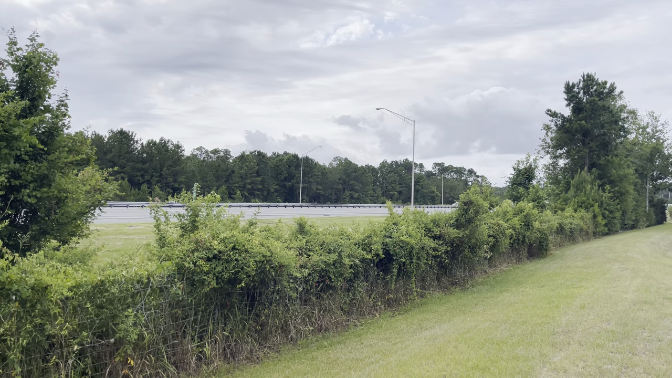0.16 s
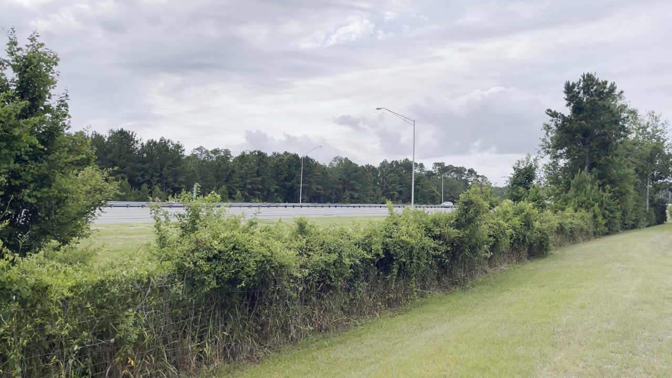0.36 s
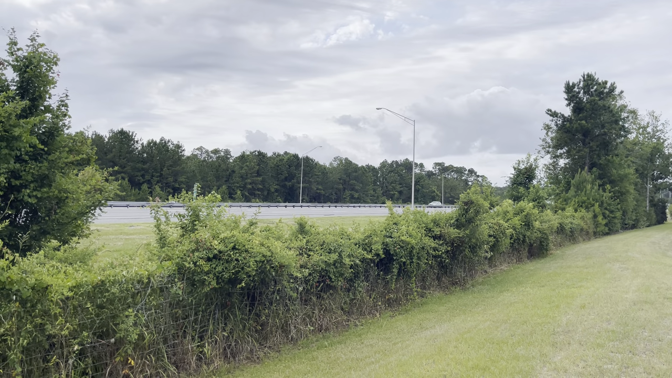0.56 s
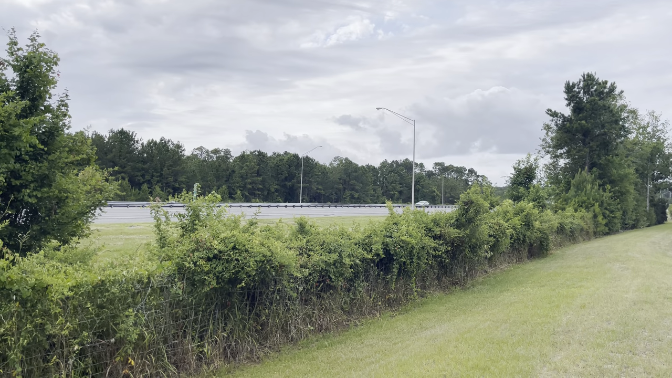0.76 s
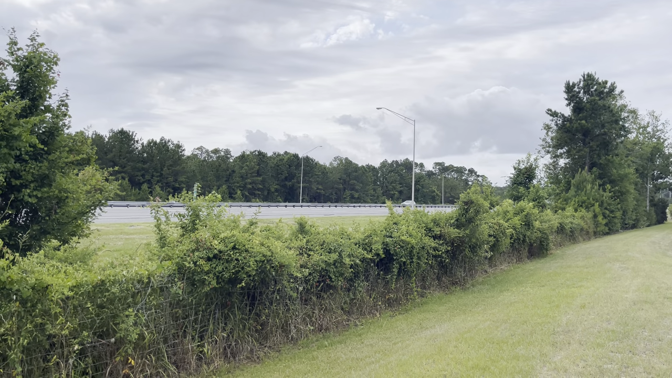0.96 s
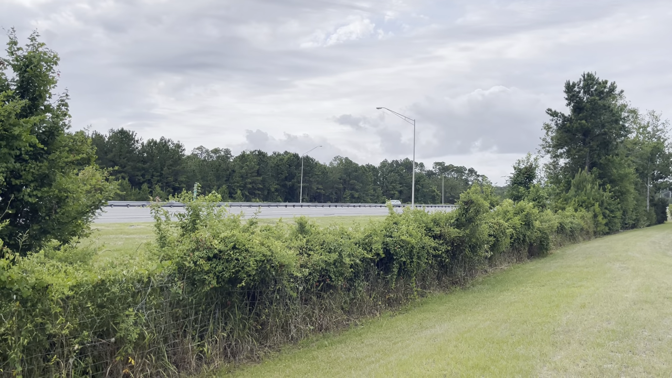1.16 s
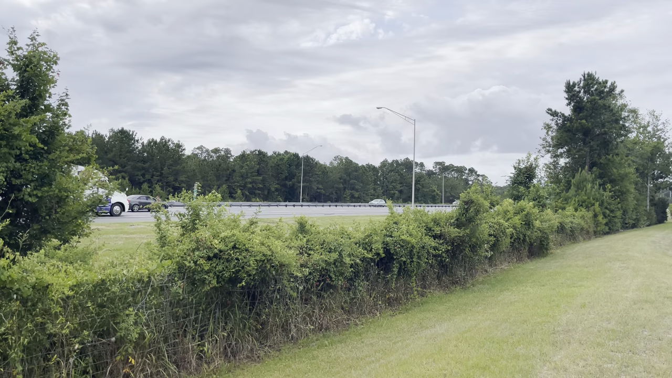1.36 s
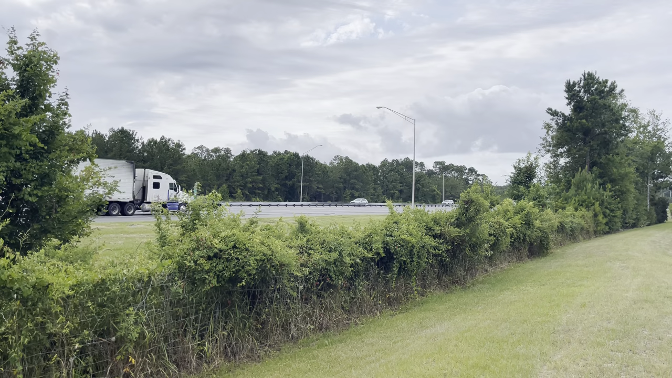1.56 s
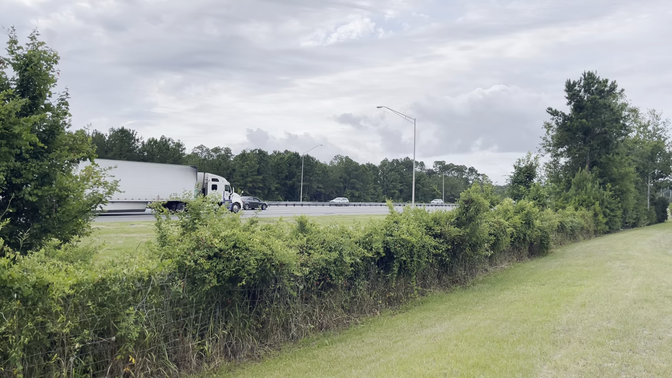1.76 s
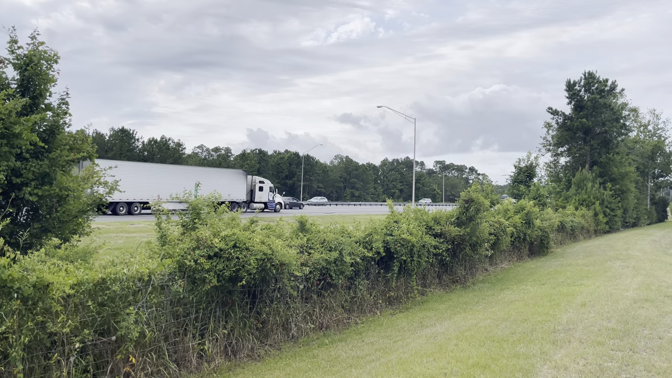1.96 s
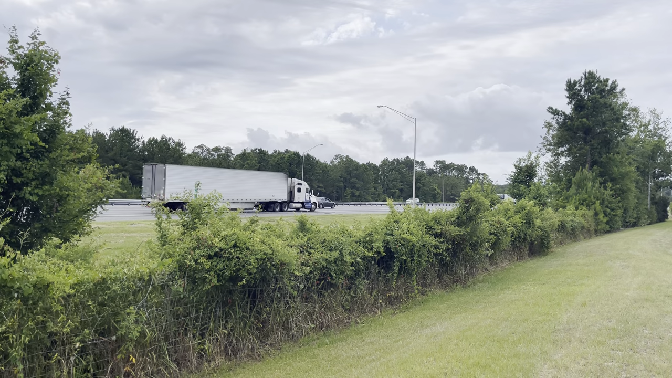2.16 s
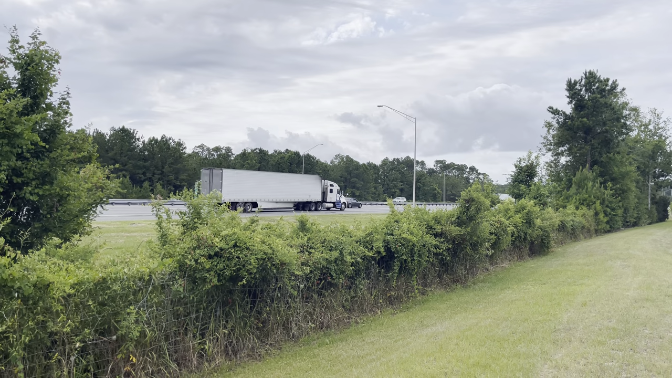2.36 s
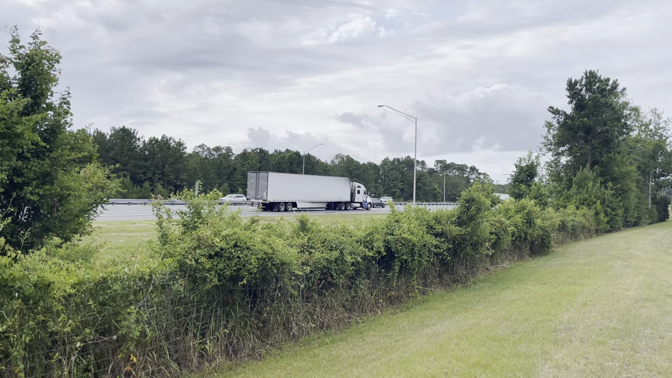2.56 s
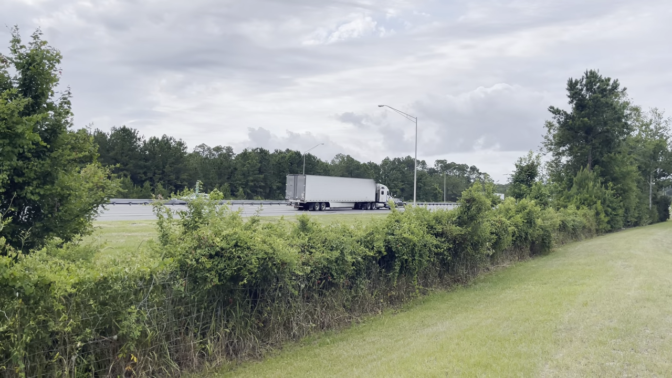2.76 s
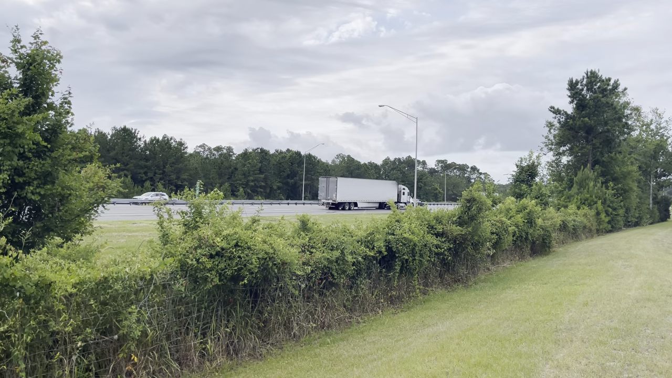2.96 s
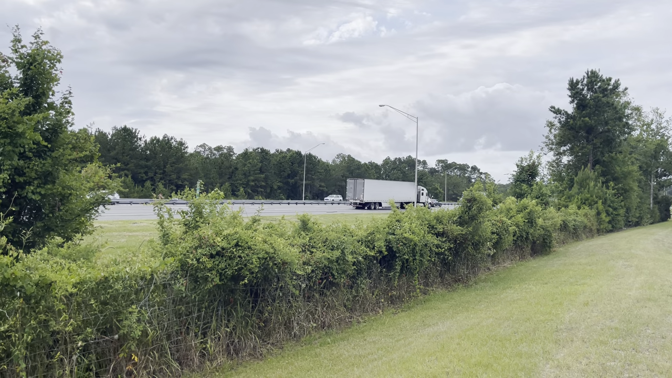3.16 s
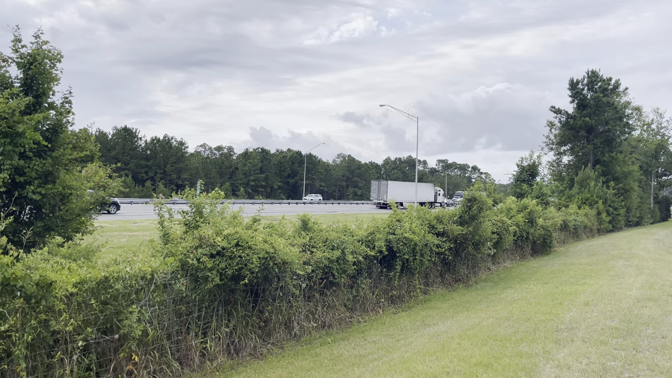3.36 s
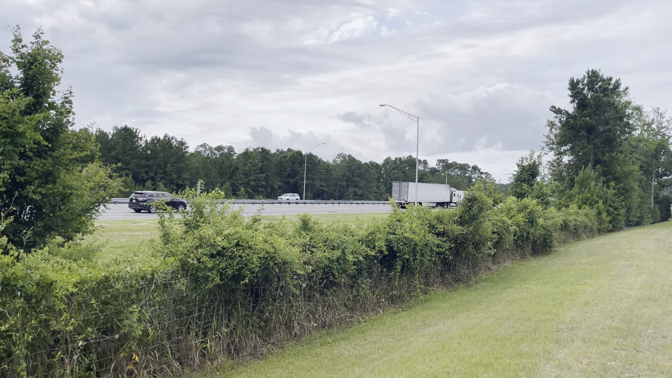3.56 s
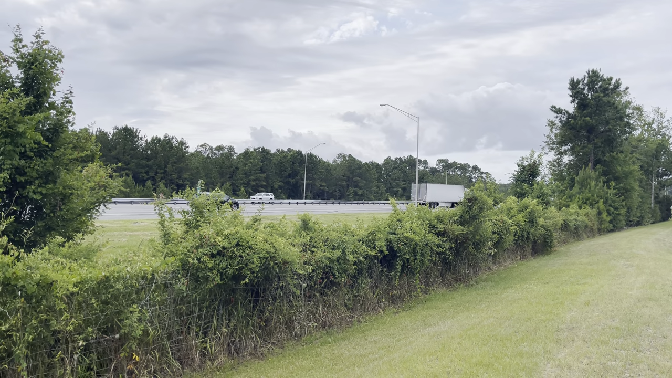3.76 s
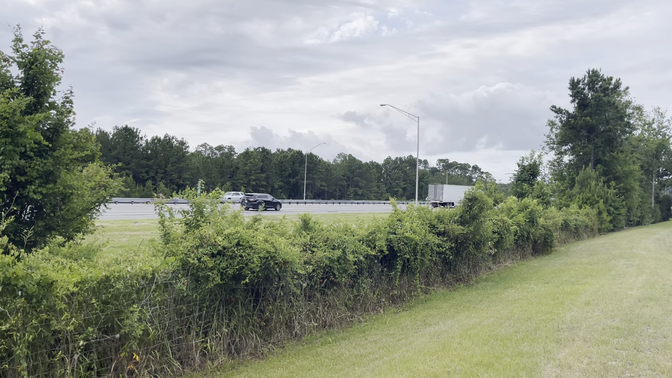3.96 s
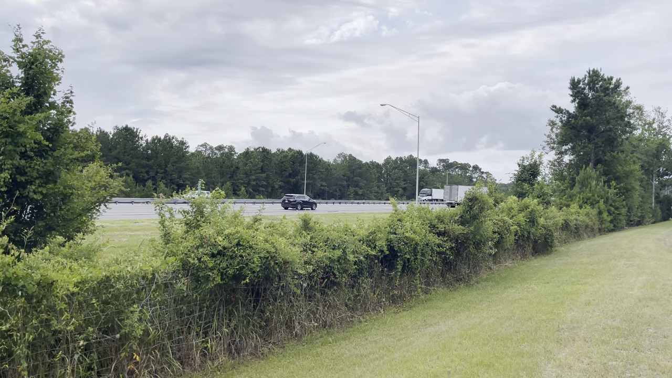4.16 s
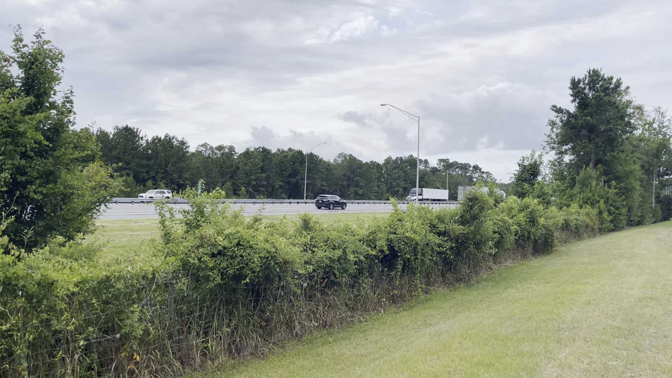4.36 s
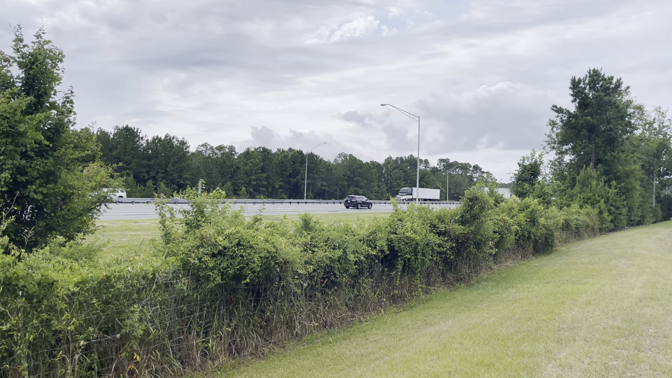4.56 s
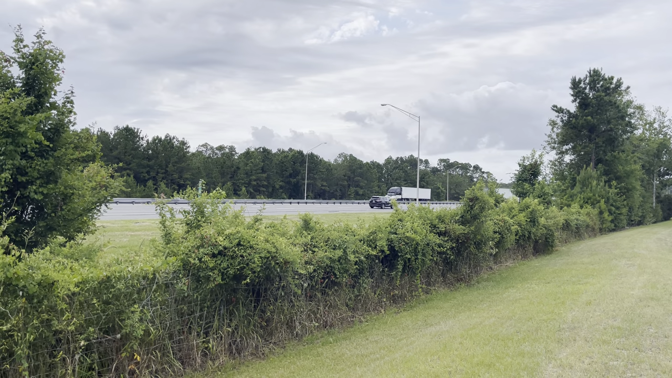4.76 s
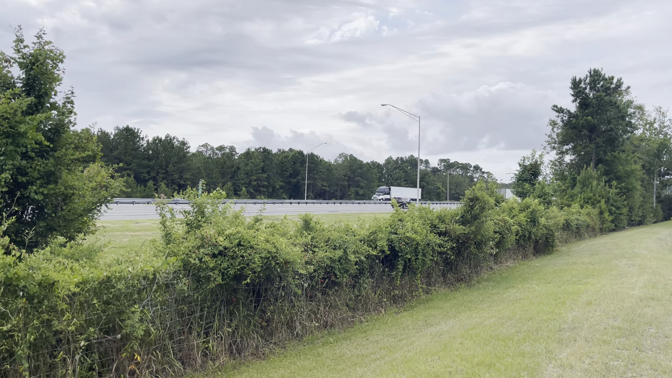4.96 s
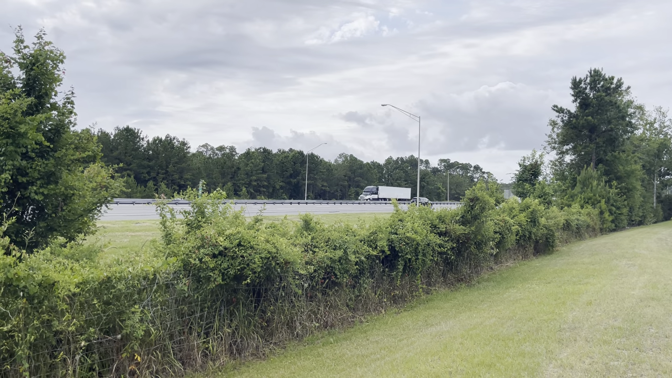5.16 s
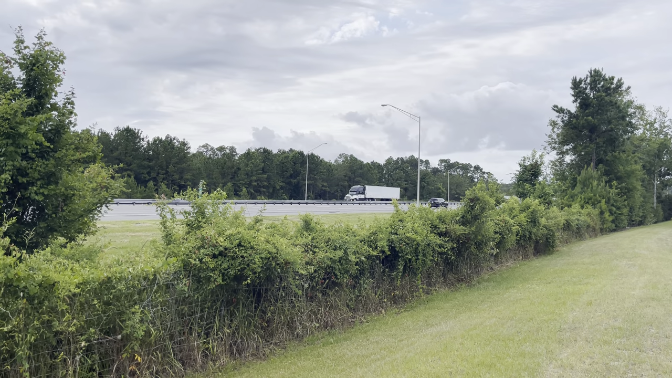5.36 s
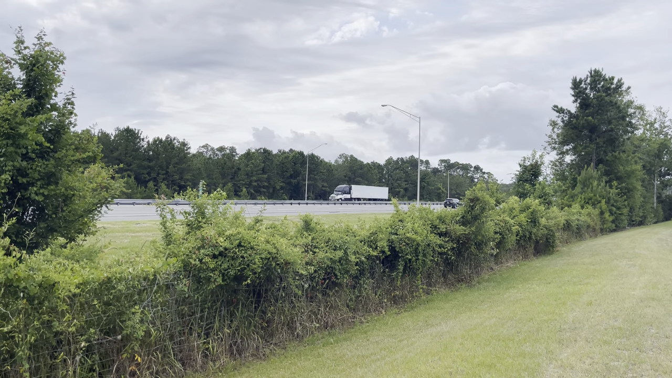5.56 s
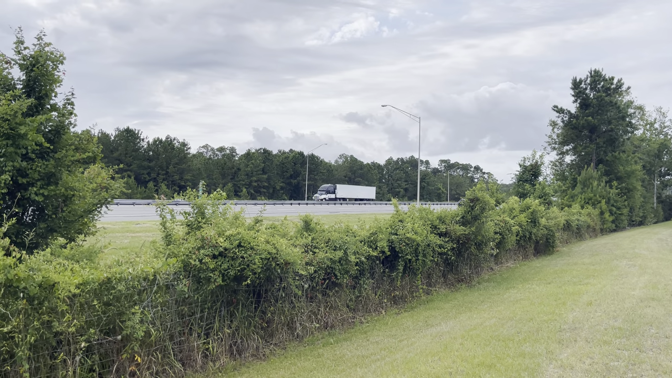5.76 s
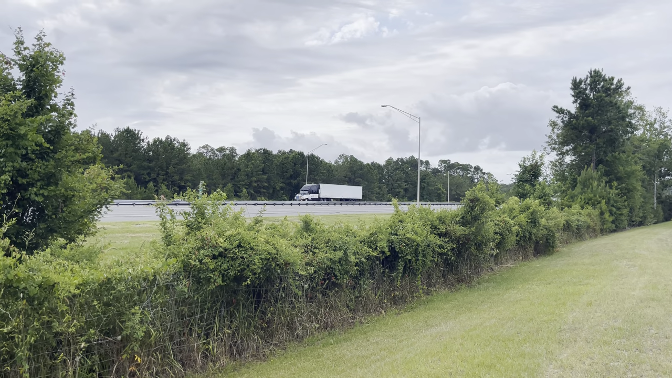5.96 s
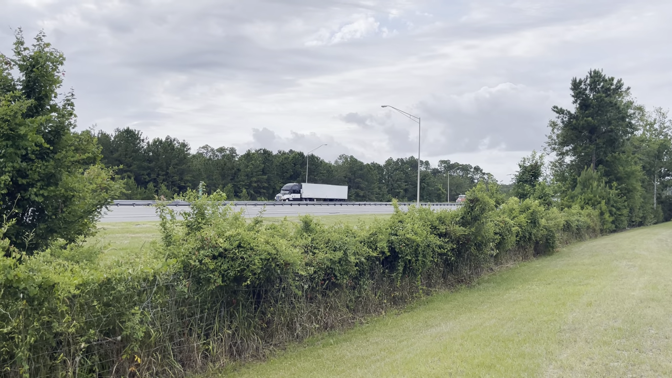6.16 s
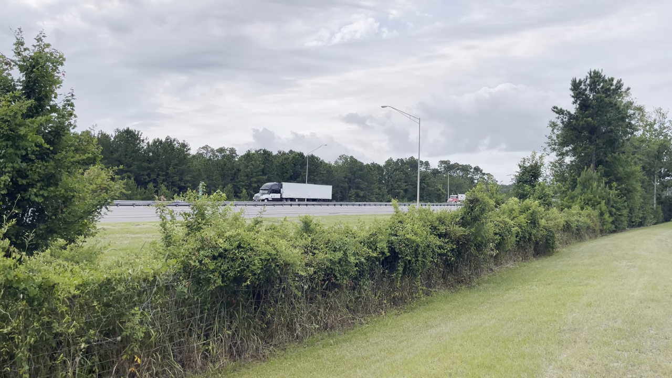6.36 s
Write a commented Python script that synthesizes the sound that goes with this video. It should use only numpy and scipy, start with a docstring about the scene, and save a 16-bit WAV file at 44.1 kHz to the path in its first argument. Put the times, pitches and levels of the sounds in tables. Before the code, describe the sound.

Wide stereo from a grassy roadside, some distance from the lanes. A truck passes early with a rough engine rush, tyre hiss and a high whine gliding downward, then dwindles to the right. Low engine hum pulses slowly while softer cars pass and a distant tyre note sings briefly. Faint high hiss and a thin insect chirr sit above the road roar; fresh tyre noise rises on the left near the close.

```python
"""Behind a hedge beside a highway. A heavy truck passes from left to right: its exhaust note (a stack of
cosines), tread drone and high whine sink together by the Doppler shift, over engine rush and tyre hiss of
shaped noise. Its note then throbs against the steady engine tones of an oncoming truck. Around it are
the tyre roar of the whole road, passing cars, a faint hiss, an insect and one small tick; near the end
more traffic draws up from the left."""
import sys
import numpy as np
from scipy import signal
from scipy.fft import rfft, irfft
from scipy.io import wavfile
from scipy.ndimage import map_coordinates

SR = 44100
rng = np.random.default_rng(int(sys.argv[2]) if len(sys.argv) > 2 else 0)


def store_wav(level_fs):
    """Save 16-bit WAV to argv[1]."""
    pcm = np.round(np.clip(np.atleast_2d(level_fs), -1, 1) * 32767)
    wavfile.write(sys.argv[1], SR, pcm.T.astype(np.int16))


N = 283122
TIME = np.arange(N) / SR  # seconds

# The roar of the whole road. Each row: pitch in Hz, relative level per Hz in dB.
ROAD_SPECTRUM = [(22, -81), (36, -60.5), (55, -51), (130, -48.5), (200, -63), (400, -69.5), (560, -58),
                 (740, -53.5), (920, -64), (1120, -62), (1800, -76), (4200, -87.5), (5500, -87.5),
                 (7200, -96.5), (8400, -100)]
# How the road swells. Each row: time in seconds, change of level in dB.
ROAD_SWELL_DB = [(0, -0.5), (1.2, -1.5), (2.6, 3.5), (3.6, 1), (5, 1.7), (5.4, -1.7), (6.42, 1.9)]
# How alike the road sounds left and right. Each row: pitch in Hz, likeness from -1 to 1.
ROAD_LIKENESS = [(60, 1), (120, 0.9), (250, 0.73), (520, 0.48), (750, 0.49), (1060, -0.31), (2170, 0.27),
                 (4460, -0.093), (9000, -0.055)]
# Tyres hidden by trees on the left at the start. Each row: pitch in Hz, relative level per Hz in dB.
HIDDEN_TYRE_SPECTRUM = [(200, -78), (450, -76), (580, -57.5), (720, -58.5), (900, -52.5), (1050, -59),
                        (1250, -78), (3000, -100)]
# Tyres of traffic drawing up on the left. Each row: pitch in Hz, relative level per Hz in dB.
ARRIVAL_TYRE_SPECTRUM = [(100, -63.5), (300, -62.5), (500, -61.5), (830, -56.5), (1100, -56.5),
                         (1500, -68.5), (2200, -78.5), (4000, -86.5), (8000, -105)]
# The shape of the high hiss. Each row: pitch in Hz, relative level per Hz in dB.
HISS_SPECTRUM = [(3000, -110), (7000, -101), (7900, -92.5), (8550, -93), (9200, -85.5), (9800, -93.5),
                 (10500, -100)]
# How loud the high hiss is. Each row: time in seconds, level in dB.
HISS_LEVEL = [(0.08, -54.5), (0.6, -51), (2.3, -50), (3.22, -55), (3.82, -54), (5.63, -56.5), (6.02, -51),
              (6.35, -55)]
# The insect's uneven swells. Each row: time in seconds, relative level in dB.
CHIRR_SWELLS = [(0, -72), (.4, -66), (.6, -51), (.75, -46.5), (1.05, -62), (1.25, -58), (1.48, -47.5),
                (1.8, -64), (2.5, -70), (2.75, -57), (3.15, -72), (3.58, -59), (3.8, -72), (4.1, -72),
                (4.35, -57.5), (4.5, -61), (4.65, -56), (4.78, -66), (5.1, -64), (5.24, -55), (5.41, -52.5),
                (5.51, -62), (5.62, -55.5), (5.74, -56), (5.85, -51.5), (6.02, -58), (6.18, -56),
                (6.32, -68)]
# The insect's pitch, and the widths of its core and skirt (Hz).
CHIRR_HZ, CHIRR_CORE_HZ, CHIRR_SKIRT_HZ = 5070, 110, 360
# Cars, each loudest in a gap between the trees. Each row: time abreast in seconds, distance of its lane
# in metres, middle of the gap in seconds, half time in the gap in seconds, relative level in dB.
CAR_PASSES = [(0.399, 35.5, 2.11, 0.57, -6), (2.6, 27.6, 4.29, 1, -9.5)]
# Tyres of a car in the near lane. Each row: pitch in Hz, relative level per Hz in dB.
CAR_TYRE_SPECTRUM = [(200, -76), (700, -58.5), (900, -80), (1040, -57.5), (1250, -65), (1800, -81),
                     (4000, -92), (8000, -108)]
# Singing tread of a vehicle further off. Each row: time in seconds, level of its main note in dB.
SINGING_LEVEL = [(0, -59), (3.5, -43), (4.45, -43), (4.6, -32.5), (4.82, -34), (5.1, -43), (6.42, -47)]
# Firing rate of the far oncoming truck as heard (Hz), and how fast it rises (Hz per second).
ONCOMING_HZ, ONCOMING_HZ_PER_S = 84.27, .046
# The oncoming truck swells in gaps between the trees. Each row: time in seconds, level of its firing in dB.
ONCOMING_SWELLS = [(0, -41.5), (2.4, -29.5), (2.95, -35.5), (3.6, -25), (4.05, -25.5), (4.55, -30),
                   (4.9, -29), (5.4, -24), (5.85, -30), (6.42, -22)]

# The passing truck: moment the cab is abreast (s), speed (m/s), distance of its lane (m).
ABREAST_S, SPEED_M_S, LANE_M = .59, 34.5, 42.1
SOUND_M_S = 343
# Its low hum and high whine before the Doppler shift (Hz).
HUM_HZ, WHINE_HZ = 147, 3200
# Its engine slows a little. Each row: time in seconds, firing rate before the Doppler shift in Hz.
FIRING_RATE = [(.5, 83.41), (3, 82.82), (6.42, 82.75)]
# Its six-cylinder exhaust. Each row: multiple of the two-turn engine cycle, relative level in dB.
EXHAUST_ORDERS = [(4, -24.5), (5, -26.5), (6, 1.5), (8, -38), (10, -41.5), (12, -15), (16, -27),
                  (18, -24.5), (20, -28.5), (22, -25.5), (26, -30), (28, -27.5)]
# Faint tones of its gears and fan. Each row: multiple of the engine cycle, relative level in dB.
GEAR_TONES = [(41, -39.5), (57, -39), (82, -33), (115, -43.5)]
# Rush of its engine bay and fan. Each row: pitch in Hz, relative level per Hz in dB.
ENGINE_RUSH_SPECTRUM = [(30, -63.5), (85, -44), (130, -46), (200, -53), (270, -46), (400, -48.5),
                        (700, -72), (1150, -56), (1400, -59.5), (1750, -60), (2200, -78.5), (3300, -70),
                        (5000, -91), (8000, -105)]
# Roar of its tyres. Each row: pitch in Hz, relative level per Hz in dB.
TRUCK_TYRE_SPECTRUM = [(100, -59.5), (400, -64), (560, -49.5), (750, -50), (900, -57.5), (1000, -64),
                       (1500, -65), (2000, -65), (2600, -73.5), (3250, -72), (3900, -87), (5000, -82),
                       (6200, -85), (7200, -97), (8400, -96), (9500, -96)]
# Air hissing out of its tyre grooves. Each row: pitch in Hz, relative level per Hz in dB.
GROOVE_SPECTRUM = [(1500, -79), (2600, -78), (3300, -73), (3900, -78.5), (4650, -78), (5200, -99),
                   (6000, -88), (7000, -100)]
# How loud its low hum is. Each row: time in seconds, level in dB.
HUM_SWELLS = [(0, -46), (.8, -42), (1.2, -32.5), (3, -29), (3.4, -36.5), (3.8, -30), (4.25, -38),
              (4.75, -32.5), (5.4, -39), (6.42, -41)]
# Its tread drone, with dips. Each row: time in seconds, level in dB.
DRONE_SWELLS = [(0, -24.5), (.4, -25), (.53, -21.5), (.73, -35), (.86, -25), (1.05, -26.5), (1.17, -31),
                (1.35, -22.5), (1.6, -27), (1.8, -36), (2.15, -34.5), (3.2, -47), (4.6, -57)]
# Rumbles and narrow howls of its tyres and trailer. Each row: middle in seconds, half length in seconds,
# pitch before the Doppler shift in Hz, width in Hz, peak level in dB.
TRUCK_HOWLS = [(2.05, 0.2, 165, 32, -30), (1.2, 0.17, 180, 40, -34), (2.07, 0.14, 310, 50, -35),
               (0.13, 0.09, 1590, 11, -39), (0.38, 0.04, 1900, 70, -43), (.2, .15, 2200, 130, -42),
               (.6, .06, 1910, 40, -39.5), (.72, .04, 1820, 20, -38), (.96, .14, 1745, 20, -37),
               (1.3, .25, 2330, 110, -46.5), (1.1, .25, 920, 60, -39), (1.9, 0.28, 1690, 66, -42),
               (1.03, 0.17, 3200, 170, -40), (1.6, 0.29, 2400, 50, -39), (1.85, 0.2, 3570, 110, -43),
               (0.26, .15, 4800, 500, -51), (1.7, 0.089, 4900, 440, -59), (2.27, 0.14, 4950, 450, -50)]
# Its high whine, rising and sinking several times. Each row: time in seconds, relative level in dB.
WHINE_SWELLS = [(0, -41), (.25, -41.5), (.55, -42), (.7, -42), (.9, -39.5), (1.1, -37), (1.25, -34),
                (1.5, -36.5), (1.8, -41.5), (2.15, -42), (2.33, -39), (2.42, -44.5), (2.57, -45),
                (2.66, -54), (2.76, -52), (2.83, -46.5), (2.96, -49), (3.07, -45.5), (3.26, -55),
                (3.42, -46), (4.05, -40.5), (4.43, -44.5), (4.66, -57), (4.82, -54.5), (5.2, -56),
                (5.85, -54.5), (6.42, -57)]
# Short flares and drop-outs of the whine. Each row: middle in seconds, half length in seconds, change in dB.
WHINE_FLARE_ROWS = [(.68, .075, 6.5), (.81, .018, -8), (.91, .045, 6.5), (1.09, .022, 7), (1.13, .02, -8),
                    (1.26, .035, 6), (1.325, .018, -12), (1.37, .02, 5), (1.5, .06, 5.5), (1.6, .015, -7),
                    (1.68, .035, 3.5), (1.8, .028, 7.5), (1.86, .02, -8), (2.04, .035, 4.5), (2.1, .02, -7),
                    (4.15, .025, -4), (4.33, .03, -6)]
# The whine wanders between the ears. Each row: time in seconds, left minus right in dB.
WHINE_BALANCE = [(.3, -2), (.68, -6), (.95, -1), (1.5, -2.5), (1.85, 3.5), (2.35, 6), (2.7, 1), (3.8, -3.5),
                 (4.5, -3.5), (5, -1)]

# The microphones: angle they are turned down the road (radians), travel time between them (ms).
FACING_RAD, PORT_MS = 1.16, 0.46
# The left microphone against the right. Each row: pitch in Hz, left minus right in dB.
LEFT_COLOUR = [(60, 1), (230, 0.5), (430, 0), (750, 3.5), (1100, 2), (1700, 0), (2200, -1), (2900, 8.5),
               (3600, 3), (4700, 0), (6400, 8.5), (7500, 4.5), (9300, 0)]
EDGE_HZ = 9800  # upper band limit


def gain_of(db):
    """Turns decibels into a plain multiplier."""
    return 10 ** (np.asarray(db) / 20)


def evened(x):
    """Scales a sound to an average strength (rms) of 1."""
    return x / np.sqrt(np.mean(x ** 2) + 1e-20)


def curves(rows):
    """Joins the rows of a timed table with straight lines: one curve per column, read at every sample."""
    s, *columns = np.transpose(rows)
    return [np.interp(TIME, s, c) for c in columns]


def read(points):
    """Reads a table over pitch at every frequency of the whole-length spectrum."""
    hz, value = np.transpose(points)
    bins_hz = np.fft.rfftfreq(N, 1 / SR)
    return np.interp(np.log(bins_hz + 1), np.log(hz + 1), value)


def noise(spectrum):
    """Random noise shaped to the given level per Hz (dB)."""
    shaped = rfft(rng.standard_normal(N)) * gain_of(read(spectrum))
    return irfft(shaped, N) * np.sqrt(SR / 2)


def drift(rate_hz):
    """Slow random wandering of rms 1, up to about the given rate."""
    hz = np.fft.rfftfreq(N, 1 / SR)
    smooth = np.exp(-.5 * (hz / rate_hz) ** 2)
    return evened(irfft(rfft(rng.standard_normal(N)) * smooth, N))


def gusts(depth_db, rate_hz):
    """Moving air makes a distant sound swell and fade at random."""
    return gain_of(depth_db * drift(rate_hz))


def swell(middle_s, half_s):
    """A smooth bell from 0 up to 1 and back."""
    return np.exp(-((TIME - middle_s) / half_s) ** 2)


def tone(hz, rough, width_hz):
    """A tone of about rms 1 on a pitch curve; the share 'rough' is scattered into a narrow band around it."""
    rough = np.clip(rough, 0, 1)
    scatter = (drift(width_hz) + 1j * drift(width_hz)) / np.sqrt(2)
    turn = np.exp(2j * np.pi * (np.cumsum(hz * np.ones(N)) / SR))
    return np.sqrt(2) * ((np.sqrt(1 - rough ** 2) + rough * scatter) * turn).real


def ports(x, lead_ms):
    """A source to one side reaches one microphone first; a positive lead favours the left."""
    half = lead_ms * SR / 2000  # half the lead, in samples
    return np.array([map_coordinates(x, [np.arange(N) + side * half], order=3, mode="mirror")
                     for side in (1, -1)])


def ground_echo(x, rate_hz, depth_ms):
    """A second path off the ground, about 2 ms late; mixed in, its slow shifts comb the sound."""
    late = (2 + depth_ms * np.tanh(drift(rate_hz))) * SR / 1000
    return map_coordinates(x, [np.arange(N) - late], order=3, mode="mirror")


def glided(x, doppler):
    """Plays a sound faster while its source approaches and slower while it recedes."""
    return map_coordinates(x, [np.cumsum(doppler)], order=3, mode="mirror")


def drive_by(abreast_s, lane_m=LANE_M):
    """A point moving left to right: Doppler factor, spreading loss (dB), lead of the left microphone (ms)."""
    bearing = np.arctan2(SPEED_M_S * (TIME - abreast_s), lane_m)
    doppler = 1 / (1 + SPEED_M_S / SOUND_M_S * np.sin(bearing))
    spread_db = 20 * np.log10(np.cos(bearing))
    return doppler, spread_db, PORT_MS * np.sin(FACING_RAD - bearing)


def beamed(level_db, lag_s, steepness):
    """Gain of a truck part loudest lag_s after the cab; steepness above 1 fades faster than 1 / distance."""
    return gain_of(level_db + steepness * drive_by(ABREAST_S + lag_s)[1])


def road():
    """Tyres of many cars from all along the road: alike in the bass, mostly unrelated in the treble."""
    same = np.clip(read(ROAD_LIKENESS), -1, 1)
    mid, side = (irfft(rfft(noise(ROAD_SPECTRUM)) * np.sqrt((1 + sign * same) / 2), N) for sign in (1, -1))
    level = gain_of(curves(ROAD_SWELL_DB)[0]) * gusts(depth_db=0.95, rate_hz=6.2)
    return np.array([mid + side, mid - side]) * level


def treble():
    """A faint high hiss of shaped noise, its level unsteady."""
    hiss = evened(noise(HISS_SPECTRUM)) * gain_of(curves(HISS_LEVEL)[0])
    return ports(hiss * gusts(depth_db=0.86, rate_hz=12), lead_ms=0.033)


def arrival():
    """Tyre roar from the left: some dies away early, more grows as traffic comes out from behind trees."""
    early = ports(noise(HIDDEN_TYRE_SPECTRUM) * swell(middle_s=0.09, half_s=.7), lead_ms=.5)
    screened_db, clear_s, rise_s = -15, 4.85, .3
    screened = (1 - np.tanh((TIME - clear_s) / rise_s)) / 2  # 1 behind the trees, 0 in the open
    level = gain_of(screened_db * screened) * gusts(depth_db=1.0, rate_hz=5.8)
    return early + ports(noise(ARRIVAL_TYRE_SPECTRUM) * level, lead_ms=0.42)


def insect():
    """A thin chirr in the hedge on the left: two random bands around one pitch, in uneven swells."""
    core = tone(CHIRR_HZ, rough=1, width_hz=CHIRR_CORE_HZ)
    skirt = 0.79 * tone(CHIRR_HZ, rough=1, width_hz=CHIRR_SKIRT_HZ)
    level = gain_of(curves(CHIRR_SWELLS)[0] - 4.0) * gusts(depth_db=1.5, rate_hz=20)
    return ports((core + skirt) * level, lead_ms=.39)


def tick(s, level_db, length):
    """One small dry tick close by: a brief bell of bright noise, a little stronger on the right."""
    snap = evened(noise([(2500, -22), (4100, -8), (4800, 6), (5600, -8),
                         (7000, -12), (8200, -11), (10000, -24)]))
    return snap * gain_of(level_db) * swell(s, length) * gain_of([[-2], [1]])  # left, right


def cars():
    """Cars sweep from left to right as noise; a far vehicle's tread sings a steady note over a low roar."""
    sweeps, gap_db = 0, 14
    for abreast_s, lane_m, gap_s, half_s, db in CAR_PASSES:
        _, spread_db, lead_ms = drive_by(abreast_s, lane_m)
        level_db = db + spread_db + gap_db * swell(gap_s, half_s)
        tyres = noise(CAR_TYRE_SPECTRUM) * gain_of(level_db) * gusts(depth_db=1.0, rate_hz=3.9)
        sweeps = sweeps + ports(tyres, lead_ms)
    note = tone(565, rough=.2, width_hz=3) + gain_of(-12) * tone(1466, rough=0.49, width_hz=7)
    low_roar = tone(410, rough=1, width_hz=60) * gain_of(-42) * swell(middle_s=4.88, half_s=.4)
    return sweeps + ports(note * gain_of(curves(SINGING_LEVEL)[0]) + low_roar, lead_ms=0.34)


def oncoming_truck():
    """A far engine grows, wavering; only its lowest orders carry, and they beat against the passing one."""
    hz = ONCOMING_HZ + ONCOMING_HZ_PER_S * TIME
    firing = tone(hz, rough=.08, width_hz=.7)
    middle = gain_of(-7.0) * tone(hz * 3 / 2, rough=0.23, width_hz=0.43)
    upper = gain_of(-25.5) * tone(2 * hz, rough=0.23, width_hz=1.6)
    return (firing + middle + upper) * gain_of(curves(ONCOMING_SWELLS)[0])


def grooves():
    """The truck's tyre hiss from many wheels, scattered by the hedge, so unlike at the two microphones."""
    level = beamed(level_db=0.5, lag_s=0.59, steepness=2.1) * gusts(depth_db=2.0, rate_hz=16)
    screen = gain_of(-8 * swell(middle_s=.1, half_s=0.54))  # trees on the left hide the wheels at first
    return np.array([noise(GROOVE_SPECTRUM), noise(GROOVE_SPECTRUM)]) * level * screen


def howls():
    """Tyre and trailer resonances come and go as the wheels turn towards and away from the microphones."""
    doppler, _, _ = drive_by(ABREAST_S)
    return sum(tone(hz * doppler, rough=1, width_hz=width_hz) * gain_of(db) * swell(s, half_s)
               for s, half_s, hz, width_hz, db in TRUCK_HOWLS)


def whine():
    """The truck's high whine: a core in a fuzzy skirt, sinking with the Doppler shift, flaring and flickering."""
    doppler = drive_by(ABREAST_S)[0]
    lead_ms = np.maximum(drive_by(ABREAST_S - .14, lane_m=30)[2], 0)
    pan = gain_of(np.array([[.5], [-.5]]) * curves(WHINE_BALANCE)[0])
    # the truck's own wake roughens the tone while it is close
    nearness = beamed(level_db=0, lag_s=.2, steepness=3)
    hz = WHINE_HZ * doppler + (2 + 9 * nearness) * drift(rate_hz=25)
    core = tone(hz, rough=.22, width_hz=16)
    skirt = (.2 + .25 * nearness) * tone(hz, rough=1, width_hz=70)
    flutter_db = 1.5 * np.tanh(drift(rate_hz=35)) - .6
    # the flicker is deepest at the beginning and the end
    flicker_depth_db = np.interp(TIME, (.4, .6, 4.4, 4.8), (4, .8, 1.2, 4))
    flicker_db = flicker_depth_db * np.tanh(drift(rate_hz=9))
    flares_db = sum(db * swell(s, half_s) for s, half_s, db in WHINE_FLARE_ROWS)
    level_db = curves(WHINE_SWELLS)[0] + flares_db + flutter_db + flicker_db
    return ports((core + skirt) * gain_of(level_db), lead_ms) * pan


def passing_truck():
    """Exhaust orders, hum, drone, gears and whine share one Doppler glide, over engine rush and tyre roar."""
    doppler, spread_db, _ = drive_by(ABREAST_S)
    lead_ms = drive_by(ABREAST_S + 0.22)[2]  # the middle of the rig trails the cab
    firing_hz = curves(FIRING_RATE)[0] * doppler
    cycle_hz = firing_hz / 6  # six firings in each engine cycle
    cycles = np.cumsum(cycle_hz) / SR
    exhaust = np.sqrt(2) * sum(gain_of(db) * np.cos(2 * np.pi * round(k) * cycles)
                               for k, db in EXHAUST_ORDERS)
    exhaust = exhaust * gain_of(1.07 * spread_db - 15.5)

    hum = tone(HUM_HZ * doppler, rough=0.17, width_hz=0.73) * gain_of(curves(HUM_SWELLS)[0])
    tread = tone(27.05 * cycle_hz, rough=.15, width_hz=6)
    drone = tread * gain_of(curves(DRONE_SWELLS)[0])

    engine = beamed(level_db=-0.8, lag_s=0.12, steepness=2.98)
    gears = sum(tone(k * cycle_hz, rough=0.36, width_hz=2.6) * gain_of(db) for k, db in GEAR_TONES)
    firing_pulse = 1 + 0.19 * np.cos(2 * np.pi * np.cumsum(firing_hz) / SR)
    rush = glided(noise(ENGINE_RUSH_SPECTRUM), doppler) * firing_pulse

    rolling = beamed(level_db=-3.0, lag_s=0.74, steepness=1.69)
    tyres = noise(TRUCK_TYRE_SPECTRUM) * rolling * gusts(depth_db=-0.2, rate_hz=3)
    roar = rush * engine + tyres
    roar = roar + .3 * ground_echo(roar, rate_hz=1.2, depth_ms=.8)
    # the many axles and the trees spread part of the roar over all directions
    spread = np.array([noise(TRUCK_TYRE_SPECTRUM), noise(TRUCK_TYRE_SPECTRUM)]) * rolling * gain_of(1.5)
    directed = exhaust + hum + drone + gears * engine + howls() + roar
    return ports(directed, lead_ms) + spread + whine()


def scene():
    """Adds up all that the two microphones receive."""
    background = road() + treble() + arrival() + insect()
    snap = tick(s=1.839, level_db=-32, length=.0025)
    return background + snap + cars() + oncoming_truck() + grooves() + passing_truck()


def record(dry):
    """Gives each microphone its colour, takes out the deepest bass (wind filter), then limits the treble."""
    tilt = gain_of(read(LEFT_COLOUR))
    colour = np.array([tilt, np.ones_like(tilt)]) / np.sqrt((1 + tilt ** 2) / 2)  # keeps the mean power
    wind_filter = gain_of(read([(15, -24), (25, -11), (33, -4), (45, 0)]))  # (Hz, dB)
    heard = irfft(rfft(dry) * colour * wind_filter, N)
    lowpass = signal.firwin(511, EDGE_HZ, window=("kaiser", 9), fs=SR)
    return signal.oaconvolve(heard, lowpass[None], "same")


dry = scene()
out = record(dry)
store_wav(out)
```